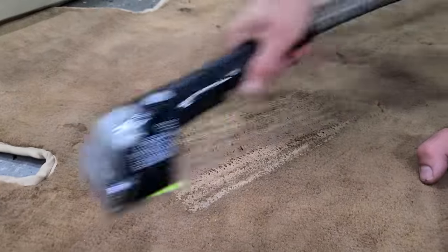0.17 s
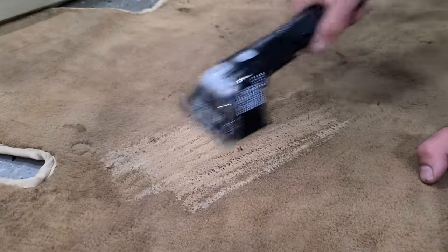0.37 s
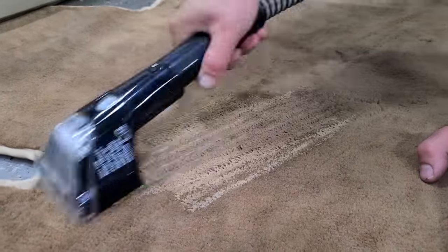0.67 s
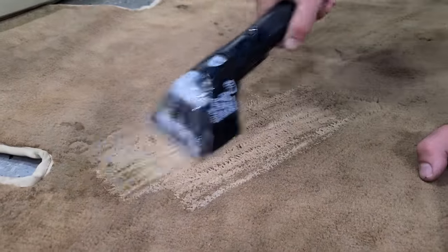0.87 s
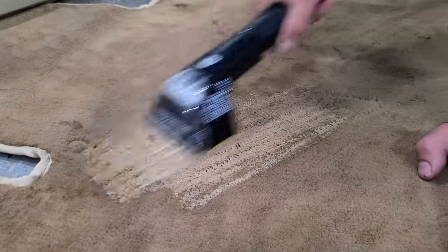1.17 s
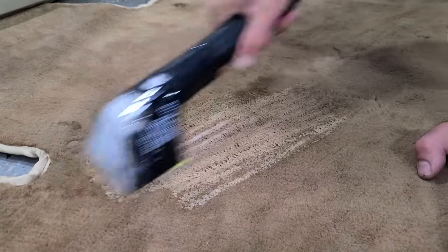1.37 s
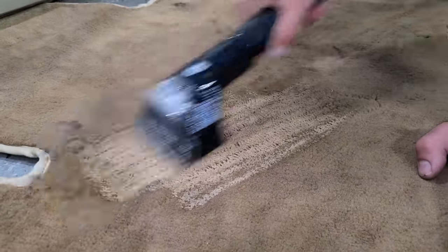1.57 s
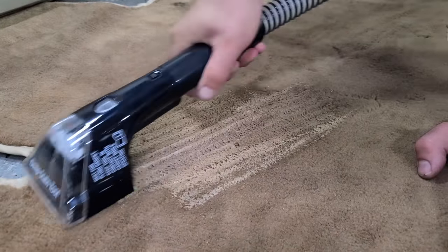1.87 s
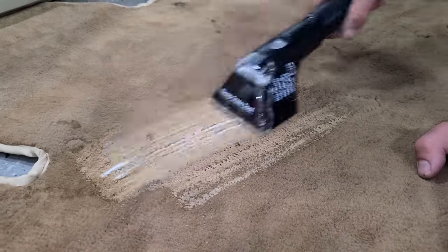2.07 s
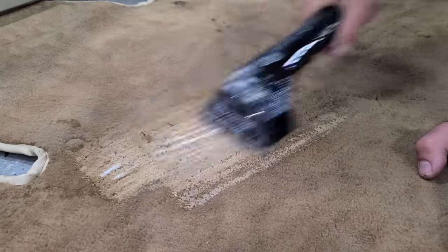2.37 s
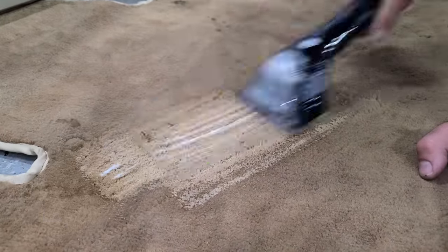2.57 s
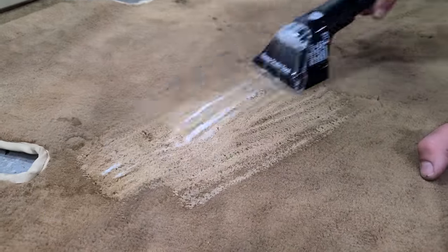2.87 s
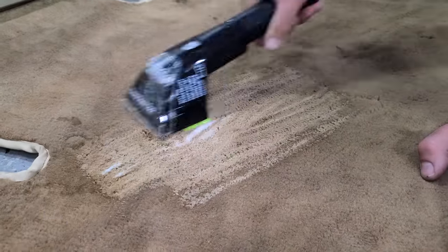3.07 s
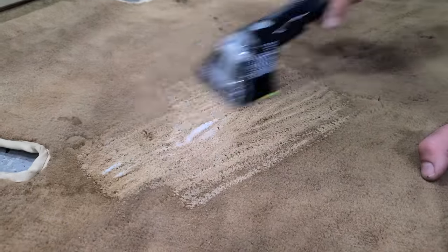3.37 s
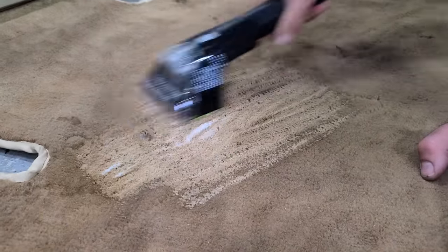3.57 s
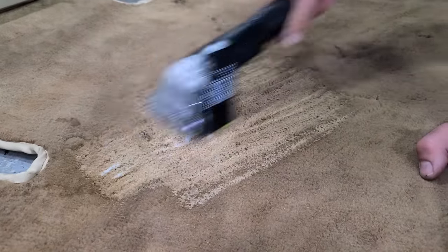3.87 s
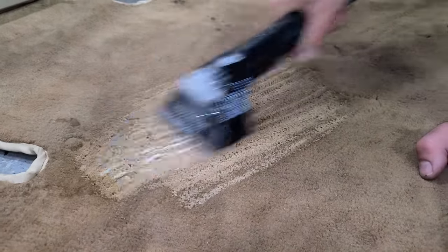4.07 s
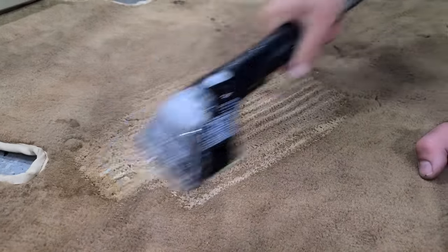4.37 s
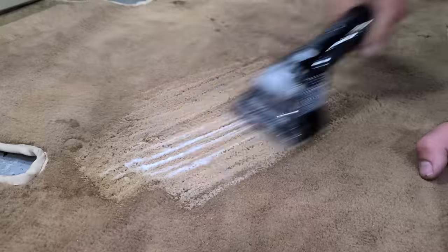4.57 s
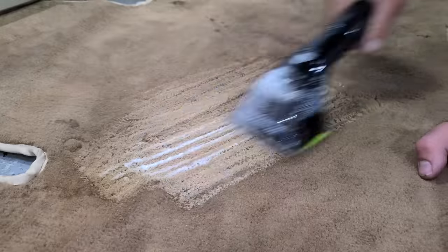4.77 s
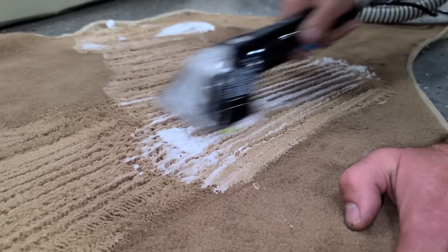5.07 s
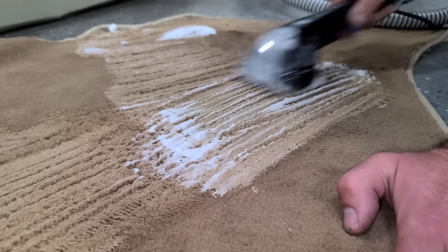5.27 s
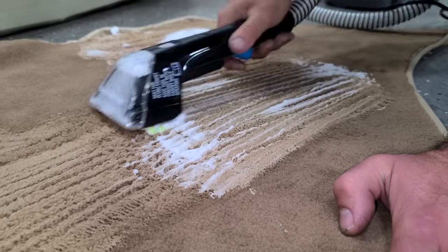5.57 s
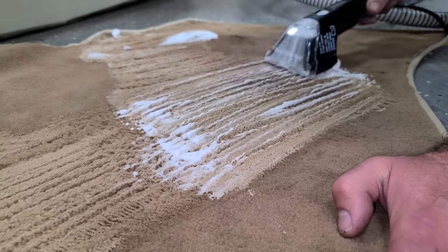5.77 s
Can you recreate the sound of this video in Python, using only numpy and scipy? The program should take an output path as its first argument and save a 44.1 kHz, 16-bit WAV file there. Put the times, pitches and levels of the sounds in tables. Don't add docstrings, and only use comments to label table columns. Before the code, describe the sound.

A small suction cleaner's motor whines steadily over a roaring air hiss while its nozzle is stroked back and forth across wet carpet.

```python
import sys
import numpy as np
from scipy import signal
from scipy.fft import rfft, irfft, next_fast_len
from scipy.io import wavfile

SR = 44100
rng = np.random.default_rng(int(sys.argv[2]) if len(sys.argv) > 2 else 0)


def boost_factor(decibels):
    exponent = np.asarray(decibels, float) / 20
    return 10 ** exponent


def bounce(signal):
    frames = np.transpose(np.atleast_2d(signal))
    limited = np.clip(frames, -1, 1)
    pcm = np.round(limited * 32767).astype(np.int16)
    wavfile.write(sys.argv[1], SR, pcm)


N = 261954

# shaft_multiple, early_db, late_db
STEADY_ORDERS = [
    (1.0013, -44.5, -41.5),
    (24, -68, -66.5),
]


def rms_one(x):
    return x / np.sqrt(np.mean(x ** 2) + 1e-20)


def in_time(rows):
    s, *columns = np.transpose(rows)
    return [np.interp(np.arange(N) / SR, s, column) for column in columns]


def drift(rate):
    pole = np.exp(-80 * np.pi * rate / SR)
    white = rng.standard_normal(N // 40 + 2002)
    slow = signal.lfilter([1], [1, -2 * pole, pole * pole], white)[2000:]
    return np.interp(np.arange(N) / 40, np.arange(len(slow)), rms_one(slow))


def humps(times, heights, lengths):
    t = np.arange(0, N + 64, 64) / SR
    place = (t - np.reshape(times, (-1, 1))) / np.reshape(lengths, (-1, 1))
    shapes = np.cos(np.pi * np.clip(place, -.5, .5)) ** 2
    return np.interp(np.arange(N) / SR, t, np.asarray(heights) @ shapes)


def strokes():
    # centre_s, hiss_swell_db, scrub_swell_db
    pushes = [(.02, 2, 3.5), (.33, 2.5, 1.5), (.58, 3, 3), (.93, 5.5, 3), (1.2, 6, 1.5), (1.34, 5, 6),
              (1.62, 4.5, 2), (1.79, 6, 0), (2.02, 5, 0), (2.22, 2.5, 3.5), (2.35, 4, 2), (2.54, 2, 6),
              (2.75, 1.5, 3.5), (2.97, 2, 2.5), (3.14, 7, 2), (3.48, 7, 1.5), (3.63, 2, 2.5),
              (3.85, 3, 6.5), (4.06, 5, 1), (4.27, 3, 5), (4.45, 3, 4), (4.72, 0.5, 3.5), (4.95, 0, 1),
              (5.17, 1, 0.5), (5.32, 0, -1), (5.53, 2, 4), (5.66, 1.5, 2), (5.92, 1, 3)]
    s, hiss_db, scrub_db = np.transpose(pushes)
    return [humps(s, hiss_db, 0.25), humps(s, scrub_db, 0.21)]


def motor(shaft, whine, steady, share, speed_matters, flutter_db, wobble, fade_db):
    orders = [
        8,
        11,
        16,
        22,
    ]
    # centre_s, depth_db, length_s
    shading = [(0.0, -11, 0.49), (.42, -4, 0.37), (1.02, -2, .3), (1.3, -6, 0.37), (1.7, -5, 0.22),
               (2.133, -7, .25), (2.75, -3, 0.52), (3.328, -3.5, 0.19), (3.78, -8, 0.41), (4.3, -8, 0.58),
               (4.62, -5, 0.56), (5.55, -4, .3), (5.94, -10, 0.21)]
    speed, = in_time(shaft)
    turns = np.cumsum(speed) / SR
    faster = (speed - 567.7) * speed_matters
    shade_db = humps(*np.transpose(shading))
    push_db = sum(strokes()) / 2
    levels = []
    for order, (db, slope, shaded, pushed) in zip(orders, whine):
        level_db = db + slope * faster + shaded * shade_db + pushed * push_db
        levels.append((order, level_db + fade_db * drift(2.5)))
    out = np.zeros(N)
    for order, level_db in levels + list(steady):
        reach = np.sqrt(order / 16)
        phase = 2 * np.pi * order * turns + wobble * reach * drift(20.0) + rng.uniform(0, 2 * np.pi)
        level = boost_factor(level_db + flutter_db * reach * drift(19.0))
        out += np.sqrt(2) * share * level * np.sin(phase)
    return out


def early_motor(share):
    # time_s, turns_per_s
    shaft = [(0, 567.5), (.22, 568.8), (.43, 567.9), (.7, 568.3), (.93, 568.1), (1.09, 569.6),
             (1.32, 568.4), (1.52, 569.3), (1.8, 568.05), (2.2, 566.9), (2.52, 566.6), (2.67, 567.0),
             (3.27, 566.3), (3.52, 567.0), (3.72, 566.6), (3.94, 569.1), (4.25, 568.0), (4.9, 567.2)]
    # level_db, slope_db_per_turn_per_s, shading_share, push_share
    whine = [
        (-45, 0, 1.2, .01),
        (-55.5, 3.5, .2, 0.5),
        (-50.5, -0.7, 0.5, .6),
        (-56, 0, .3, .8),
    ]
    steady = [row[:2] for row in STEADY_ORDERS]
    return motor(shaft, whine, steady, share, True, flutter_db=2.4, wobble=0.23, fade_db=0.7)


def late_motor(share):
    # time_s, turns_per_s
    shaft = [
        (4.4, 574.5),
        (5.1, 574.35),
        (5.94, 574.48),
    ]
    # level_db, slope_db_per_turn_per_s (idle here), shading_share, push_share
    whine = [
        (-49, 0.01, .9, .01),
        (-60, 0.01, .1, .3),
        (-49, 0.01, .1, .2),
        (-51, 0.01, -.1, .7),
    ]
    steady = [row[::2] for row in STEADY_ORDERS]
    return motor(shaft, whine, steady, share, False, flutter_db=0.8, wobble=.1, fade_db=.5)


def air_colour(path, hz):
    # pitch_hz, level_db_per_hz
    turbulence = [(25, -118), (50, -91.5), (110, -82), (150, -75), (205, -65.5), (900, -62), (1700, -66.5),
                  (3000, -74), (5000, -67), (9300, -76.5), (10800, -88), (13500, -80), (15800, -91)]
    knots_hz, knots_db = np.transpose(turbulence)
    level_db = np.interp(np.log(hz), np.log(knots_hz), knots_db)
    for centre_hz, width_hz, db in path:
        level_db = level_db + db / (1 + (2 * (hz - centre_hz) / width_hz) ** 2)
    return boost_factor(level_db)


def air(early, late, patchy_db, treble_follow, slot_dip_db):
    # centre_hz, width_hz, level_db
    path_early = [(226, 69, 5), (508, 74, -11.5), (700, 82, -2.5), (803, 73, 5), (952, 170, 9),
                  (1120, 33, -8), (1291, 126, 6), (1644, 234, -10), (1804, 320, 4), (2064, 94, 3),
                  (2515, 194, 10.5), (2730, 990, -8.5), (3140, 490, 5.5), (3420, 1000, -4.5),
                  (4705, 76, -6), (5110, 320, 5), (5340, 350, -8), (6060, 420, -4), (7250, 540, -5.5),
                  (8280, 366, 2), (10200, 860, -0.5), (11400, 372, -7), (13176, 452, 1),
                  (16245, 6400, -7.5),
                  (6900, 140, -1.5),
        (9500, 220, -6),
        (11650, 260, 4),
        (13450, 160, -3),
        (14300, 260, 4),
    ]
    path_late = [(213, 100, 5.5), (397, 53, 3), (485.5, 114, -7.5), (750, 100, -2.5), (805, 61, 8.5),
                 (954, 38, 12), (1224, 250, 7.5), (1750, 800, -7.5), (2200, 220, 4.5), (2850, 540, -6.5),
                 (3250, 143, 3), (3500, 210, -4), (4200, 116, -1), (5860, 1640, -6.5), (7426, 1000, -5),
                 (8021, 2428, 2.5), (9809, 2355, -5), (11600, 810, -2), (12600, 400, 5), (15414, 2600, -12)]
    # time_s, level_db
    roar = [(0, -28.5), (.33, -32), (1, -30.5), (1.65, -31), (2.3, -30.5), (3, -30), (3.3, -31.5), (4, -30),
            (4.6, -30), (5.3, -28), (5.94, -30)]
    # low_hz, high_hz
    control_bands = [
        (700, 1400),
        (6400, 8900),
        (9400, 12300),
    ]
    size = next_fast_len(N)
    hz = np.maximum(np.arange(size // 2 + 1) * SR / size, 1)
    colours = [air_colour(path, hz) for path in (path_early, path_late)]
    noises = [rfft(rng.standard_normal(size)) * np.sqrt(SR / 2) * colour for colour in colours]

    hiss_swell, scrub_swell = strokes()
    wanted_db = in_time(roar) + [-47 + hiss_swell, -54 + scrub_swell]
    swells = []
    for (low, high), level_db in zip(control_bands, wanted_db):
        inside = (hz > low) & (hz < high)
        powers = [np.sum(colour[inside] ** 2) * SR / size for colour in colours]
        swells.append(level_db - 10 * np.log10(powers[0] * early ** 2 + powers[1] * late ** 2))
    roar_db, hiss_db, scrub_db = swells

    still = np.zeros(N)
    anchors_hz = [350, 900, 3300, 4600, 7000, 10800, 15000]
    anchors_db = [still, roar_db, still, still + slot_dip_db, hiss_db, scrub_db, treble_follow * scrub_db]
    centres = np.geomspace(250, 16000, 19)
    out = np.zeros(N)
    for k, centre in enumerate(centres):
        tent = np.interp(np.log(hz), np.log(centres), np.arange(len(centres)) == k)
        place = np.interp(np.log(centre), np.log(anchors_hz), np.arange(len(anchors_hz)))
        swell_db = sum(max(0, 1 - abs(place - i)) * a for i, a in enumerate(anchors_db))
        first, second = [irfft(noise * tent, size)[:N] for noise in noises]
        out += boost_factor(swell_db + patchy_db * drift(9.4)) * (early * first + late * second)
    return out


def howl(wander_hz, flutter_db):
    # time_s, pitch_hz, level_db
    hose_tone = [(0, 908, -31.5), (.25, 929, -33.5), (.5, 968, -33), (1.25, 958, -33.5), (1.7, 990, -36),
                 (2.15, 966.5, -35), (2.6, 939.6, -36), (3.05, 955.4, -34), (3.4, 950, -39.5),
                 (3.95, 960, -34.5), (4.4, 970, -33.5), (4.8, 932.4, -32), (5.0, 918, -50),
                 (5.05, 820, -35), (5.3, 824, -36), (5.6, 819.5, -35), (5.94, 805, -36)]
    hz, level_db = in_time(hose_tone)
    phase = 2 * np.pi * np.cumsum(hz + wander_hz * drift(25.47)) / SR
    return np.sqrt(2) * boost_factor(level_db + flutter_db * drift(26.0)) * np.sin(phase)


def band_noise(white, hz, width_hz):
    edges_hz = [hz - width_hz / 2, hz + width_hz / 2]
    return signal.sosfilt(signal.butter(2, edges_hz, "band", fs=SR, output="sos"), white)


def grille(early):
    # centre_hz, width_hz, level_db, patchiness_db
    whistle = (13220, 170, -64, 4)
    hz, width_hz, db, patchy_db = whistle
    patches = boost_factor(db + patchy_db * drift(7.0))
    return early * patches * rms_one(band_noise(rng.standard_normal(N), hz, width_hz))


def slot_rush():
    # centre_hz, width_hz, level_db
    modes = [
        (4360, 500, -0.5),
        (4940, 410, 1.5),
    ]
    # centre_s, peak_db
    openings = [(.01, -44), (.29, -53), (.72, -40), (1.08, -40), (1.26, -46), (1.46, -39.5), (1.58, -45),
                (1.88, -40), (2.0, -43), (2.32, -46), (2.52, -45), (2.861, -45), (3.15, -46), (3.3, -47),
                (3.53, -41.5), (3.77, -44), (3.97, -41.5), (4.14, -48), (4.33, -46), (4.63, -43.5),
                (4.8, -46), (5.02, -41), (5.38, -44), (5.61, -40.5), (5.81, -43.5)]
    white, rush = rng.standard_normal(N), 0
    for hz, width_hz, db in modes:
        rush = rush + boost_factor(db) * band_noise(white, hz, width_hz)
    s, peak_db = np.transpose(openings)
    leak_db, open_s = -70, 0.3
    return (boost_factor(leak_db) + humps(s, boost_factor(peak_db), open_s)) * rms_one(rush)


def bumps(rise_s, trim_db):
    # peak_s, peak_db
    touch_downs = [(0.049, -52), (0.519, -54), (0.918, -55), (1.329, -48), (1.389, -52), (2.229, -57),
                   (2.569, -45), (2.989, -57), (3.369, -50), (3.799, -54), (4.309, -52), (5.919, -60)]
    thud_hz = 73
    t = np.arange(int(.12 * SR)) / SR
    push = t / rise_s * np.exp(1 - t / rise_s) * np.sin(2 * np.pi * thud_hz * t)
    out = np.zeros(N + len(t))
    for s, db in touch_downs:
        start = round((s - rise_s) * SR)
        out[start:][:len(t)] += boost_factor(db + trim_db) * push
    return out[:N]


def scene():
    # start_s, end_s
    dissolve = (4.62, 5.07)
    blend = np.interp(np.arange(N) / SR, dissolve, [0, 1])
    early, late = (1 - blend) ** 0.62, blend ** 0.62
    mix = early_motor(1 - blend) + late_motor(blend)
    mix += air(early, late, patchy_db=.5, treble_follow=1.1, slot_dip_db=-3.5)
    mix += howl(wander_hz=33.07, flutter_db=1.5)
    mix += grille(early)
    mix += slot_rush()
    mix += bumps(rise_s=0.015, trim_db=-2.5)
    return mix[None]


def top_cut(x):
    return signal.sosfilt(signal.butter(12, 15640, fs=SR, output="sos"), x)


def record(dry):
    rounded = .3 * np.tanh(dry / .3)
    return top_cut(rounded)


dry = scene()
out = record(dry)
bounce(out)
```